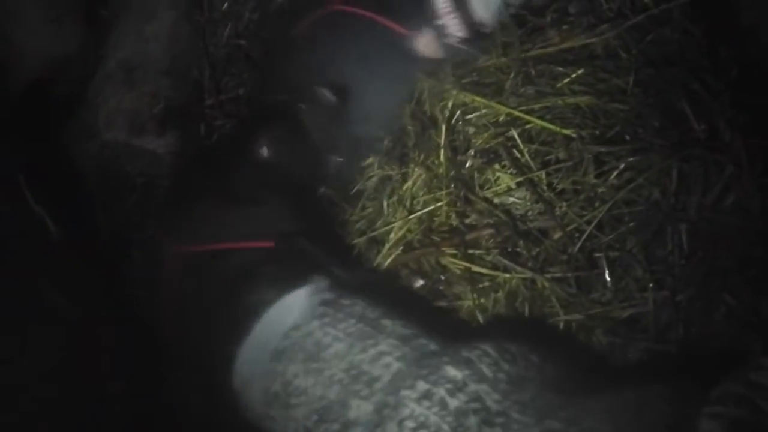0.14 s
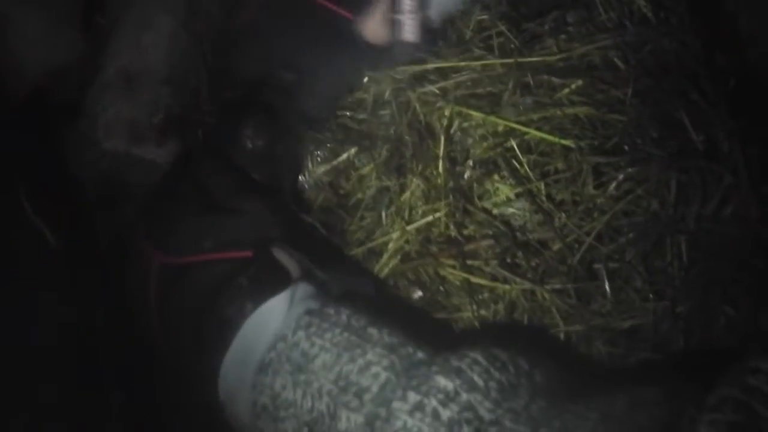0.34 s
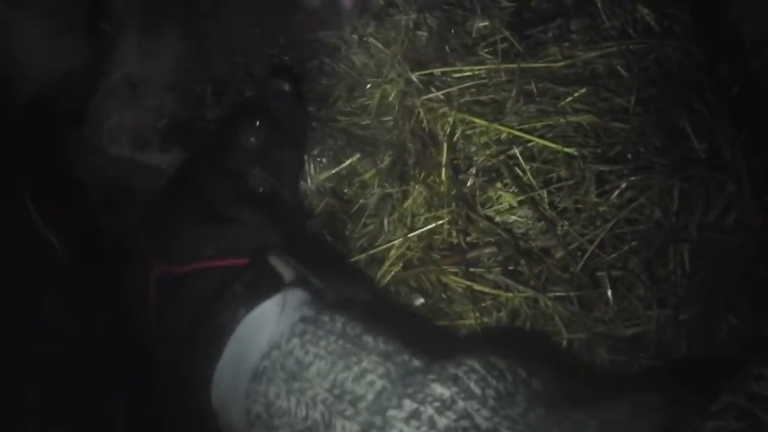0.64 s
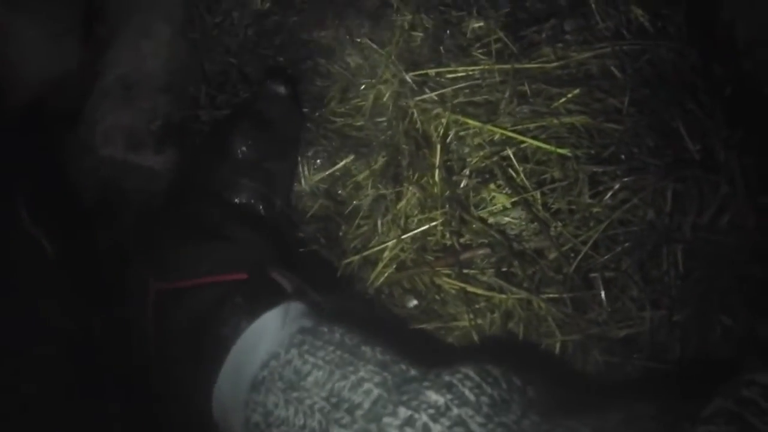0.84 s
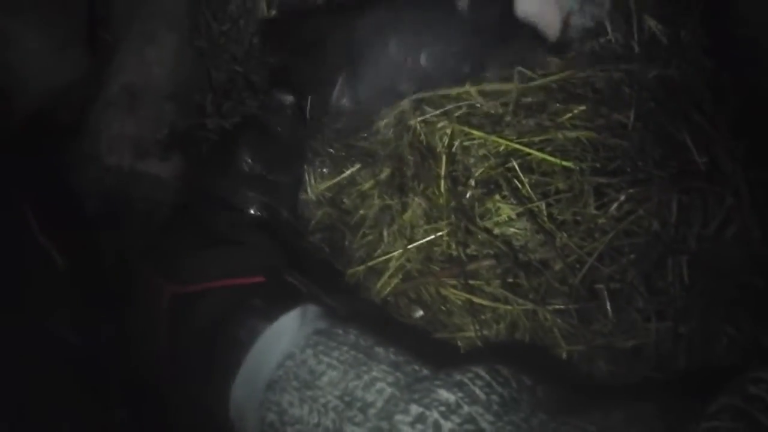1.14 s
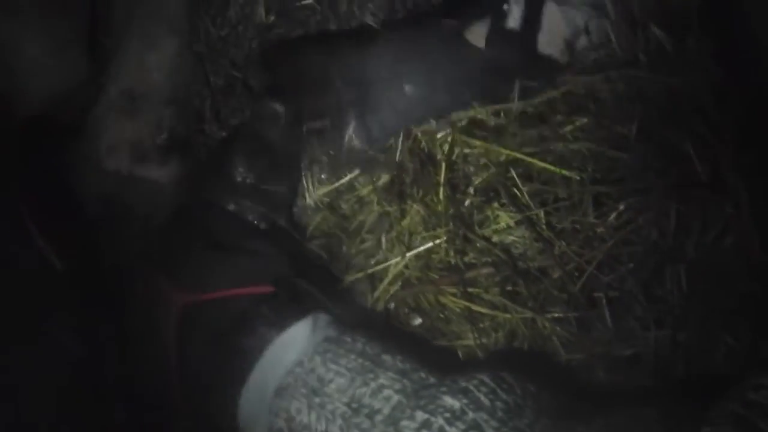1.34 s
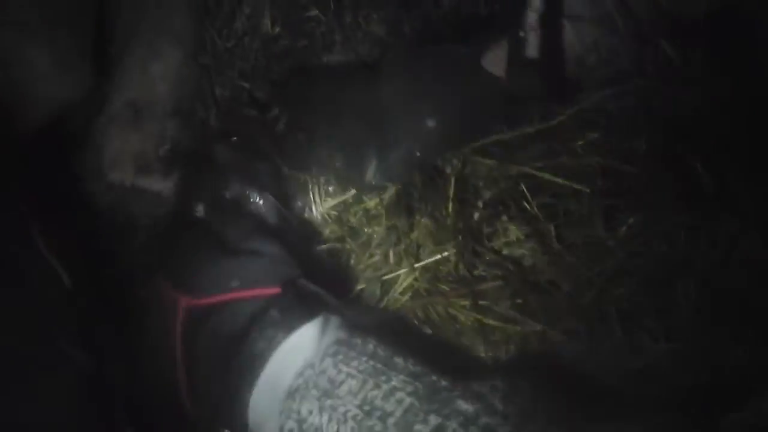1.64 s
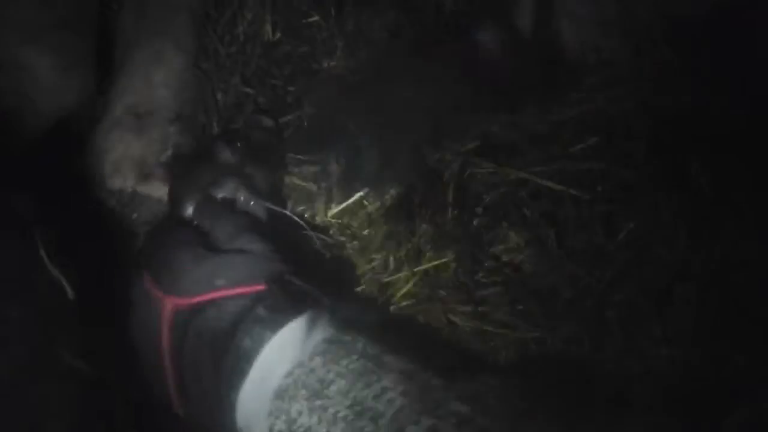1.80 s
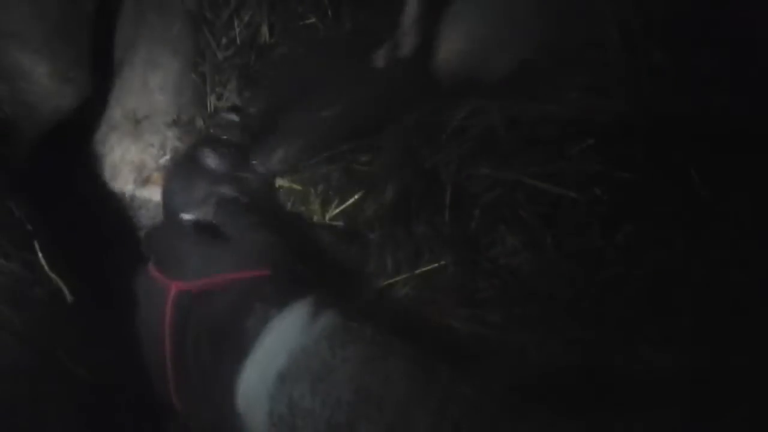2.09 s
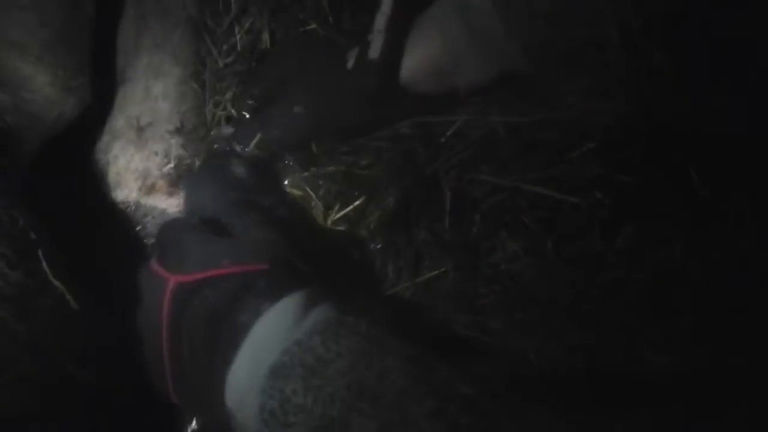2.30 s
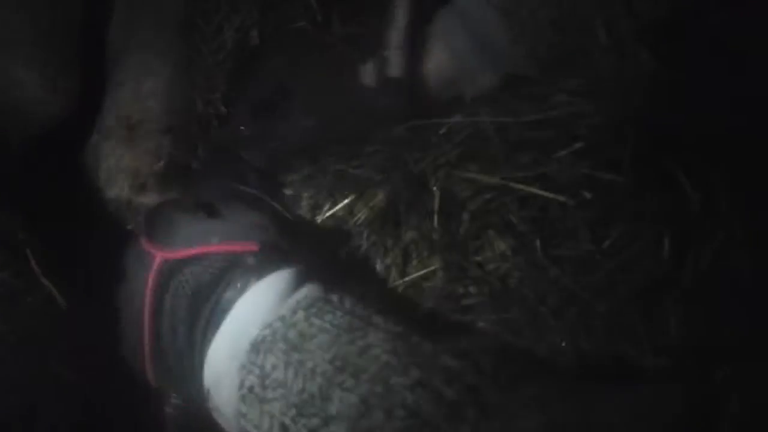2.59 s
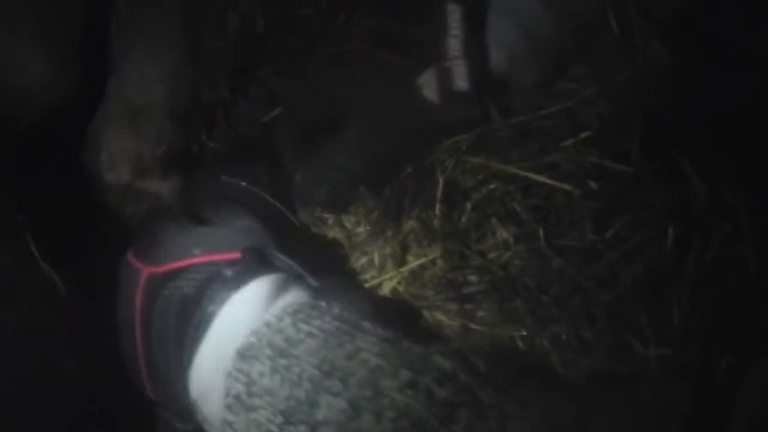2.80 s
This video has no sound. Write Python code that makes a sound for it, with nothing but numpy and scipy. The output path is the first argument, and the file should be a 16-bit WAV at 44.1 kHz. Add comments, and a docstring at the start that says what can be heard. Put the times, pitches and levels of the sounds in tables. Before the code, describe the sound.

Close up in a barn pen, straw crackles and a pig grunts hard, snuffles, grunts again, snuffles more busily with faint nasal whistles, then gives a third grunt, with short wall echoes and steady dull air.

```python
"""Pig grunting in a straw pen

A pig grunts three times and snuffles in between: uneven pulses ring fixed throat and chest resonances,
and noise through fluttering nostrils makes the snuffles. Sniffs, whistles, thuds and scuffs join in.
Straw rustles (filtered noise and crackles) and snaps (short ringing bursts) over the steady air of a barn.
The pen walls echo the pig, and the microphone has sharp treble peaks."""
import sys
import numpy as np
from scipy import signal
from scipy.fft import rfft, irfft
from scipy.io import wavfile
from scipy.ndimage import uniform_filter1d

SR = 44100
rng = np.random.default_rng(int(sys.argv[2]) if len(sys.argv) > 2 else 0)


def makeup_ratio(level_db):
    """Linear amplitude ratio for a level in decibels (20 dB per factor of ten)."""
    decades = np.asarray(level_db, float) / 20
    return 10 ** decades


def pcm_store(signal):
    """Save signal as 16-bit PCM."""
    levels = np.round(np.clip(np.atleast_2d(signal), -1, 1) * 32767)
    wavfile.write(sys.argv[1], SR, levels.astype(np.int16).T)


N = 130095  # length in samples

# All levels hold ahead of the microphone's colour.
# spectrum of the barn air: (f/Hz, relative level/dB)
BARN = [(12, -31), (20, 3.5), (101, 0.5), (279, -11.5), (412, -1.5), (546, -8.5), (1090, -12.5),
        (1410, -11), (3500, -17.5), (4550, -38)]
# how alike the two microphone ports hear spread sound: (f/Hz, likeness 0 to 1)
ALIKE = [(1000, 0.75), (2000, 0.55), (4000, 0.71), (8500, 0.4), (11500, 0.36)]
# treble response of the microphone: (f/Hz, gain/dB)
MIC = [(7000, -0.5), (7650, 3.5), (7850, -30), (8100, 7), (9500, -4.5), (10100, -6.5), (10800, 2),
       (11900, 10.5), (12300, -81), (13200, -43)]
# rustling straw: (t/s, level at 8-10 kHz/dB, level at 3-7.5 kHz before band trims/dB)
RUSTLE = [(0, -57, -56.5), (.3, -55.5, -55.5), (.5, -57.5, -52), (.85, -55, -53), (1.1, -59.5, -57),
          (1.5, -60, -59), (2.0, -57, -51), (2.2, -49, -54.5), (2.5, -59, -60), (2.95, -55, -51)]
# straw snaps: (t/s, peak level/dB, body below 6 kHz re peak/dB, top above 10.5 kHz re peak/dB,
# left minus right/dB)
SNAPS = [(0.2199, -19, -11, -33, -3.5), (0.2278, -31, 4, -24, 0), (0.4222, -35.5, 4.5, -20, 18),
         (0.615, -30.5, -17, -19, 2), (0.634, -30.5, -1.5, -26, 1), (1.003, -43, -16, -17, 15),
         (1.0301, -34.5, 2.5, -28, 10), (1.331, -33, -24, -20, -2), (1.3402, -26, -4.5, -20, 2),
         (1.3513, -27, -4, -22, -7.5), (1.3639, -32, -26, -20, 0), (1.7473, -42.5, 17.5, -16, -1),
         (1.997, -24.5, -17, -26, 0.0), (2.0058, -25.5, -6, -27, 0.0), (2.1079, -35, 6, 12, 0)]
# soft thuds of bodies on the bedding: (t/s, level/dB, f/Hz)
THUDS = [(1.237, -40, 197), (1.817, -38, 102), (2.498, -39.5, 122)]
# the snout pushes through straw: (t/s, length/s, level/dB)
SCUFFS = [(2.184, 0.16, -38), (2.739, 0.11, -46.5)]
# gliding hiss of air drawn through a pinched nostril:
# (t/s, length/s, level/dB, first f/Hz, last f/Hz); the resonance sits 5 % below these f
SNIFFS = [(1.144, 0.15, -50, 5200, 4100), (2.26, 0.029, -40.5, 4160, 4100)]
# short nasal whistles: (t/s, length/s, level/dB, first f/Hz, last f/Hz)
WHISTLES = [(1.275, .038, -37.5, 1010, 810), (2.315, .095, -40, 460, 430), (2.43, .055, -48, 1780, 2180)]
# snuffles, the first row being a brief rustle of straw at the very start, made the same way: (t/s, length/s,
# nose level/dB, rasp level at 1-3 kHz/dB, hiss level at 3-5 kHz/dB, top level above 8 kHz/dB)
SNUFFLES = [(0, 0.04, -79, -78, -48, -42.5), (0.596, 0.21, -50, -49.5, -55.5, -74),
            (0.862, 0.091, -44, -59.5, -60, -73), (1.177, 0.14, -40.5, -52, -66, -57.5),
            (1.278, 0.026, -62, -62, -37, -35), (1.569, .12, -35, -42, -50, -46),
            (1.765, 0.15, -50, -51, -54, -65), (1.876, 0.089, -36.5, -41, -53, -50),
            (1.968, 0.1, -52.5, -50, -72, -79), (2.198, 0.13, -72, -57, -49, -48),
            (2.261, 0.1, -36.5, -42.5, -45, -56), (2.407, 0.087, -45.5, -50.5, -54.5, -57),
            (2.725, 0.23, -49.5, -49, -59.5, -83)]
# resonances of a snuffle, low to high: (f/Hz, nominal width/Hz, relative level/dB)
NOSE = [(388, 110, -2.5), (463.6, 60, 5.5), (582.4, 133, -3), (803, 110, -2.5)]
RASP = [(1170, 300, 4), (1970, 150, 9), (2450, 350, -3)]
HISS = [(4120, 370, 17), (3366, 870, 2.5)]
TOP = [(9140, 1120, -0.73), (11500, 680, -1.2)]
# hardest single slaps of the vocal folds: (t/s, level/dB)
SLAPS = [(0.393, -12.5), (0.401, -13), (0.43, -6.5), (1.406, -14.5), (1.764, -32), (2.578, -22.5),
         (2.586, -12), (1.381, -25)]
# each of the three grunts: rows of (t/s, throat level/dB, chest level/dB)
GRUNTS = [
    [(.391, -37, -26), (.404, -24, -22.5), (.417, -41.5, -29.5), (.434, -19, -34.5), (.468, -31, -23.5),
     (.51, -34.5, -37), (.545, -44, -37), (.585, -44.5, -38.5), (.62, -48.5, -60)],
    [(1.364, -40.5, -29.5), (1.388, -28.5, -33.5), (1.416, -24.5, -26), (1.44, -28.5, -30),
     (1.474, -37.5, -47), (1.51, -46.5, -56)],
    [(2.577, -24.5, -24.5), (2.6, -22, -29.5), (2.616, -17, -29.5), (2.632, -34.5, -22.5),
     (2.65, -30.5, -29), (2.686, -41.5, -48), (2.71, -42, -36), (2.75, -50, -48.5)],
]
# fixed resonances of throat, snout and pen, then of the chest:
# (f/Hz, nominal width/Hz, relative level mouth open/dB, relative level mouth shut/dB)
THROAT = [(396, 40, -12, -3), (450, 40, -5, 0), (560, 60, 0, 0), (645, 45, -4, -4), (810, 200, 0, -8),
          (700, 50, -4, -6), (1022, 50, -3, -9), (1290, 90, -17, -18)]
CHEST = [(53, 29, -12.5, -9.5), (102, 18, -1.5, -6), (172.5, 56, -35.5, -5), (194.4, 35.7, -3.5, -6)]
# mouth resonances, which sink as it shuts, and palate ones, which stay:
# (f/Hz, nominal width/Hz, relative level/dB)
MOUTH = [(1650, 184, 1), (2000, 155, 3), (2740, 1670, -10)]
PALATE = [(3450, 120, 0.59), (4610, 530, -2.6)]

BARN_DB = -52.5
PEN_T60, PEN_DB, PEN_WIDE = .16, -9, .35  # s to fade by 60 dB, dB, share of left-right difference
CRACKLES_PER_S, CRACKLE_DB, SMOOTH = 3600, 2.5, .49  # per channel; size spread; amount of plain noise
RUSTLE_TOP_DB = -13  # highest rustle band against the 8-10 kHz level
SNAP_S = .0009  # fading time of a snap's burst, s
SNIFF_WIDTH_HZ = 352  # nominal
OCTAVE_DB = -10  # octave of a whistle against its tone
LATE = 1.8  # how late a sniff, or at most a snuffle's treble, swells
FLUTTER_HZ, FLUTTER = 62, .3  # mean nostril rate, depth as a share
ONSET_S, ARCH = .004, .9  # snuffle rise time, power of its arch
SWELL_S = .09  # snuffles longer than this swell later in the treble, shorter ones sooner
NOSE_DRIFT = .03  # rms share by which nose resonances wander
SLAP_S, SLAP_BRIGHT_DB = .006, -20  # damping time, mouth and palate against throat
FAST_PER_S, SLOW_PER_S, CLOSING_S = 194, 80, .06  # pulse rates mouth open and shut, closing time
JITTER_OPEN, JITTER_SHUT, UNEVEN_DB = .09, .35, 3.5  # rms rate wander as a share, pulse level spread
GRUNT_AIR, MOUTH_PULSE = .25, .55  # breath in the pulses, pulses in the breath
MOUTH_DB, PALATE_DB = -15.5, -23.5  # against the throat
MOUTH_SAG, MOUTH_OPENS_S = .1, .008  # share by which mouth resonances sink, rise time in s


def evened(x):
    """Scales to rms 1."""
    return x / np.sqrt(np.mean(x ** 2) + 1e-20)


def wander(size, smooth):
    """Noise smoothed over a number of samples, scaled to rms 1."""
    return evened(uniform_filter1d(rng.standard_normal(size), int(smooth)))


def read(points, hz):
    """Reads a spectrum on a log axis."""
    f, value = np.transpose(points)
    return np.interp(np.log(hz + 1), np.log(f + 1), value)


def add(mix, s, sound):
    """Mixes a sound in at time s."""
    part = mix[..., round(s * SR):][..., :sound.shape[-1]]
    part += sound[..., :part.shape[-1]]


def resonate(x, hz, width):
    """One resonance, fixed or moving: shift it down to zero Hz, smooth, shift back."""
    turn = np.exp(2j * np.pi * np.cumsum(hz * np.ones(x.shape[-1])) / SR)
    r = np.exp(-np.pi * abs(width) / SR)
    return 2 * (turn * signal.lfilter([1 - r], [1, -r], x / turn, axis=-1)).real


def bank(x, table, column=2, glide=1):
    """Resonances side by side, each run twice to be steep, all shifted by the factor glide."""
    total = 0
    for k, row in enumerate(table):
        hz, width = glide * row[0], 1.29 * row[1]
        ring = resonate(resonate(x, hz, width), hz, width)
        total = total + (-1) ** k * makeup_ratio(row[column]) * ring  # neighbours have opposite signs
    return total


def controls(rows):
    """Time axis, short fades at the ends, and each table column as a line in time."""
    rows = np.array(rows)
    t = np.arange(rows[0, 0], rows[-1, 0], 1 / SR)
    edge = np.minimum(np.minimum(t - t[0], t[-1] - t) / .0022, 1)
    return t, edge, [np.interp(t, rows[:, 0], c) for c in rows.T[1:]]


def coloured(x, db):
    """Filters by a dB function of frequency."""
    size = N + 2048
    gain = makeup_ratio(db(np.fft.rfftfreq(size, 1 / SR)))
    return irfft(rfft(x, size) * gain, size)[..., :N]


def spread(a, b):
    """Two microphone ports from two unrelated signals, as alike as ALIKE says."""
    alike = np.clip(read(ALIKE, np.fft.rfftfreq(N, 1 / SR)), 0, 1)
    mid = rfft(a) * np.sqrt((1 + alike) / 2)
    side = rfft(b) * np.sqrt((1 - alike) / 2)
    return irfft(np.array([mid + side, mid - side]), N)


def barn():
    """Steady air of the barn: coloured noise, swelling a little."""
    air = coloured(spread(*rng.standard_normal((2, N))), lambda hz: read(BARN, hz))
    swell = evened(uniform_filter1d(uniform_filter1d(rng.standard_normal(N), 3000), 3000))
    return makeup_ratio(BARN_DB + 3.8 * swell) * evened(air)


def pen(x):
    """Short sparse echoes of the pen walls: random taps that fade away."""
    t = np.arange(SR // 3) / SR
    signs = rng.choice([-1., 1.], (2, len(t)))
    chosen = rng.random((2, len(t))) < .05
    taps = signs * chosen * makeup_ratio(-60 * t / PEN_T60) * (t > .003)
    wet = signal.fftconvolve(x[None], taps / np.linalg.norm(taps[0]), axes=1)[:, :N]
    return spread(wet[0], PEN_WIDE * wet[1])


def straw():
    """Dense small crackles over a smooth rustle that comes in patches."""
    size = makeup_ratio(CRACKLE_DB * np.minimum(rng.exponential(1, (2, N)), 5))
    size = size * (rng.random((2, N)) < CRACKLES_PER_S / SR)
    crackles = evened(size * rng.choice([-1, 1], (2, N)))
    fizz = spread(*(crackles + SMOOTH * rng.standard_normal((2, N))))
    s, high_db, low_db = np.transpose(RUSTLE)
    t = np.arange(N) / SR
    high_db, low_db = np.interp(t, s, high_db), np.interp(t, s, low_db)
    bands = [(4000, 3000, low_db - 4.5), (5300, 2380, low_db - 5), (6790, 1940, low_db - 2.0),
             (8574, 1200, high_db), (11110, 280, high_db + RUSTLE_TOP_DB)]
    return sum(makeup_ratio(db + 4.66 * wander(N, 2100)) * evened(bank(fizz, [(hz, width, 0)]))
               for hz, width, db in bands)


def snap(db, body_db, top_db, pan_db):
    """A stalk breaks: a short burst, ringing in three bands; the highest stays central."""
    t = np.arange(400) / SR
    burst = np.exp(-t / SNAP_S) * rng.standard_normal(400) * .3 + (t == 0)  # noise after a click
    bands = [(8610, 620, 0), (4100, 2100, 0), (11440, 1270, 0)]
    parts = [bank(burst, [band]) for band in bands]
    ring, body, top = [makeup_ratio(db + d) * p / abs(p).max() for d, p in zip((0, body_db, top_db), parts)]
    return (ring + body) * makeup_ratio(np.array([[pan_db / 2], [-pan_db / 2]])) + top


def thud(db, hz):
    """A soft low push: three cycles that swell and fade."""
    t = np.arange(0, 3 / hz, 1 / SR)
    return makeup_ratio(db) * np.sin(2 * np.pi * hz * t) * np.sin(np.pi * t / t[-1]) ** 2


def scuff(length, db):
    """A soft swell of hiss from sliding stalks."""
    t = np.arange(0, length, 1 / SR)
    shape = np.sin(np.pi * t / length) ** 2 * makeup_ratio(2 * wander(len(t), 300))
    return makeup_ratio(db) * shape * evened(bank(rng.standard_normal(len(t)), [(7230, 3100, 0)]))


def sniff(length, db, first_hz, last_hz):
    """Noise in one sliding resonance, swelling towards its end."""
    t = np.arange(0, length, 1 / SR)
    glide = np.linspace(first_hz, last_hz, len(t))
    air = bank(rng.standard_normal(len(t)), [(.95, SNIFF_WIDTH_HZ, 0)], glide=glide)
    return makeup_ratio(db) * np.sin(np.pi * (t / length) ** LATE) * evened(air)


def whistle(length, db, first_hz, last_hz):
    """A narrowed nostril sings a wavering, fading tone with its octave."""
    t = np.arange(0, length, 1 / SR)
    hz = np.linspace(first_hz, last_hz, len(t)) * (1 + .014 * wander(len(t), 150))
    turn = 2 * np.pi * np.cumsum(hz) / SR
    shape = np.sqrt(abs(np.sin(np.pi * np.sqrt(t / length)))) * (1 + .41 * wander(len(t), 100))
    return makeup_ratio(db) * shape * (np.sin(turn) + makeup_ratio(OCTAVE_DB) * np.sin(2 * turn))


def snuffle(length, *levels_db):
    """Air forced through fluttering nostrils: quick onset, then an arch, timed apart in the treble."""
    t = np.arange(0, length, 1 / SR)
    onset = np.minimum(t / ONSET_S, 1)
    low, high = [onset * np.sin(np.pi * (.11 + .89 * (t / length) ** lag)) ** ARCH
                 for lag in (1, min(length / SWELL_S, LATE))]
    turns = rng.random() + np.cumsum(FLUTTER_HZ * (1 + .27 * wander(len(t), 560))) / SR
    air = (1 + FLUTTER * np.sin(2 * np.pi * turns)) * rng.standard_normal(len(t))
    drift = 1 + NOSE_DRIFT * wander(len(t), 1390)
    layers = zip((low, high, high, high), levels_db, (NOSE, RASP, HISS, TOP))
    return sum(shape * makeup_ratio(db) * evened(bank(air, part, glide=drift)) for shape, db, part in layers)


def slap(db):
    """One hard closing of the vocal folds, soon damped; it rings throat, mouth and palate."""
    knock = np.pad(np.hanning(12), (0, 2000))
    low, high = [bank(knock, part) for part in (THROAT, MOUTH + PALATE)]
    ring = low / abs(low).max() + makeup_ratio(SLAP_BRIGHT_DB) * high / abs(high).max()
    return makeup_ratio(db) * ring * np.exp(-np.arange(len(ring)) / SR / SLAP_S)


def grunt(rows):
    """Vocal pulses slow down and grow uneven while the mouth shuts; they ring throat and chest."""
    t, edge, (throat_db, chest_db) = controls(rows)
    mouth = np.exp(-((t - t[0]) / CLOSING_S) ** 3)  # 1 open, 0 shut
    rate = SLOW_PER_S + (FAST_PER_S - SLOW_PER_S) * mouth
    jitter = JITTER_SHUT + (JITTER_OPEN - JITTER_SHUT) * mouth
    turns = .7 + np.cumsum(rate * (1 + jitter * wander(len(t), 200))) / SR
    # one pulse at each whole turn, then a fading puff of breath
    pulses = (np.diff(np.floor(turns), prepend=0) > 0) * makeup_ratio(UNEVEN_DB * rng.standard_normal(len(t)))
    puffs = evened(np.exp(-(turns % 1) / .25) * rng.standard_normal(len(t)))
    drive = evened(pulses / np.sqrt(rate)) + GRUNT_AIR * puffs
    throat, chest = [mouth * evened(bank(drive, part, column=2))
                     + (1 - mouth) * evened(bank(drive, part, column=3)) for part in (THROAT, CHEST)]
    breath = MOUTH_PULSE * drive + puffs
    sinking = 1 - MOUTH_SAG * (1 - mouth)
    air = makeup_ratio(MOUTH_DB) * evened(bank(breath, MOUTH, glide=sinking))
    air = air + makeup_ratio(PALATE_DB) * evened(bank(breath, PALATE))
    air = air * np.minimum((t - t[0]) / MOUTH_OPENS_S, 1)
    return t[0], edge * (makeup_ratio(throat_db) * (throat + air) + makeup_ratio(chest_db) * chest)


def scene():
    """Pig in the middle with its echoes, straw and barn air around it."""
    pig, snaps = np.zeros(N), np.zeros((2, N))
    for rows in GRUNTS:
        add(pig, *grunt(rows))
    for mix, table, source in [(pig, SNUFFLES, snuffle), (pig, WHISTLES, whistle), (pig, SLAPS, slap),
                               (pig, THUDS, thud), (pig, SCUFFS, scuff), (pig, SNIFFS, sniff),
                               (snaps, SNAPS, snap)]:
        for s, *row in table:
            add(mix, s, source(*row))
    return pig + makeup_ratio(PEN_DB) * pen(pig) + snaps + straw() + barn()


def low_pass(x):
    """Removes everything above the highest recorded frequency."""
    return signal.sosfilt(signal.butter(12, 13370, fs=SR, output="sos"), x)


def record(dry):
    """The microphone colours the sound, with sharp peaks and dips in the treble."""
    finished = coloured(dry, lambda hz: read(MIC, hz))
    return low_pass(finished)


dry = scene()
out = record(dry)
pcm_store(out)
```